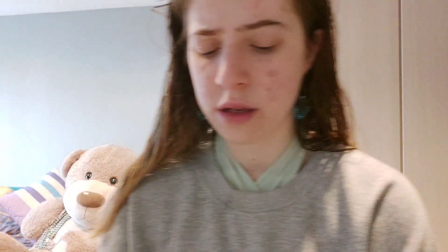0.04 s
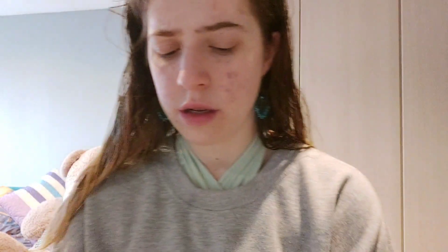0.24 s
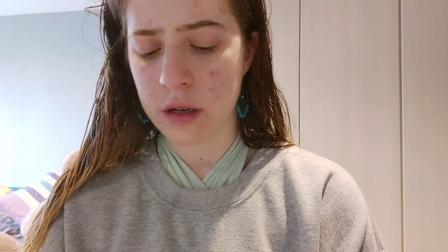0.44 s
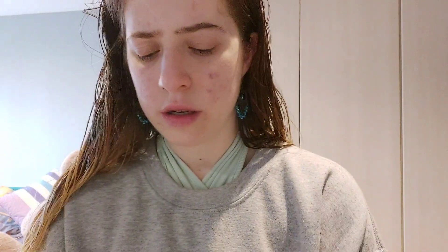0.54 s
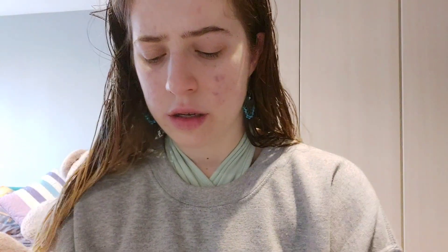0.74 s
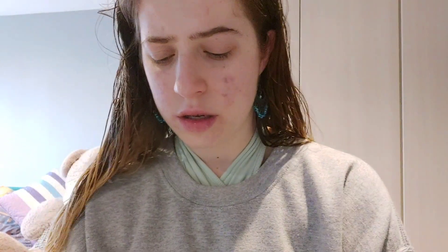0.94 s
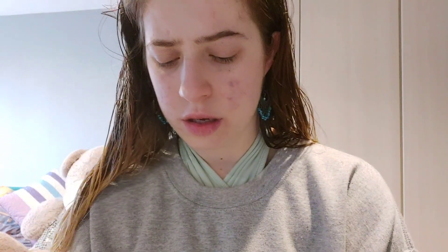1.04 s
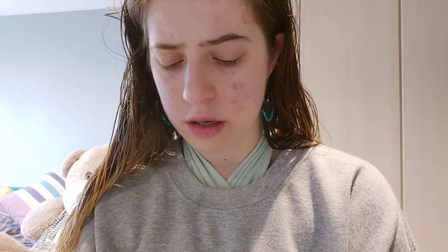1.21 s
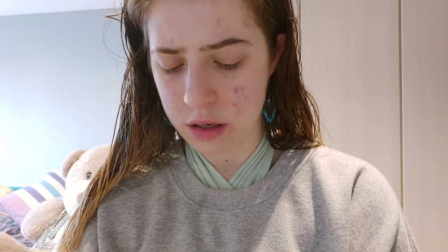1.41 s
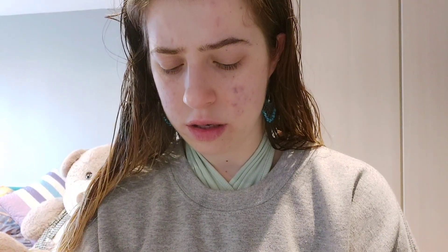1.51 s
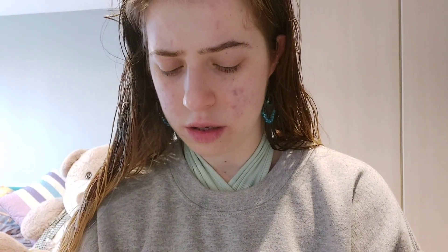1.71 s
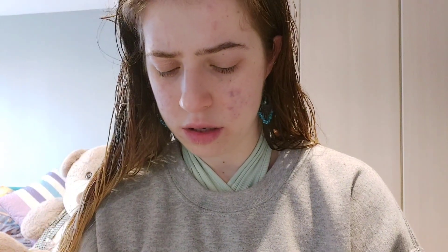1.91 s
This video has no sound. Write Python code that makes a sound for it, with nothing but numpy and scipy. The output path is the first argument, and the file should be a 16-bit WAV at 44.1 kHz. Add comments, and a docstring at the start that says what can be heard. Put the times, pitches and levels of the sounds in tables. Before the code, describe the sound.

Jewellery pieces tap, slide and clack in a box, close by in a quiet bedroom.

```python
"""Soft rubbing and light taps come first: small jewellery picked through in a box, close by.
Each piece lands with a hollow knock, a hard clack and a bright tick, and the room rings briefly.
Two loud clacks stand out, near 0.4 and 1.5 s, each led by a tiny scrape and topped by a metal clink.
In between, the pieces slide and rattle softly. The small, quiet bedroom answers every contact."""
import sys
import numpy as np
from scipy import signal
from scipy.fft import rfft, irfft, next_fast_len
from scipy.io import wavfile

SR = 44100
rng = np.random.default_rng(int(sys.argv[2]) if len(sys.argv) > 2 else 0)


def dump_mix(stems):
    """Bounce the given channels to the path in sys.argv[1] as a 16-bit WAV at rate SR."""
    frames = np.atleast_2d(stems).T  # one column per channel
    limited = np.clip(frames, -1, 1)  # hard clip at full scale
    pcm = np.round(limited * 32767).astype(np.int16)
    wavfile.write(sys.argv[1], SR, pcm)


N = 85995
SIDES = np.array([[1], [-1]])  # left, right


def amp(db):
    """Decibels to gain."""
    return 10 ** (np.asarray(db) / 20)


def unit_rms(x):
    """Scale to rms 1."""
    return x / np.sqrt(np.mean(x ** 2) + 1e-20)


def unit_hit(x):
    """Scale to the energy of 10 ms at rms 1."""
    return x / np.sqrt(np.sum(x ** 2) / (SR / 100) + 1e-20)


def along(points, hz):
    """Read a curve of (Hz, value) points on a log frequency axis."""
    freqs, values = np.transpose(points)
    return np.interp(np.log(hz + 1), np.log(freqs + 1), values)


def eq(points):
    """An EQ curve through (Hz, dB) points, as gain against frequency."""
    return lambda hz: amp(along(points, hz))


def hump(centre_hz, q):
    """A broad resonance with steep skirts, as gain against frequency."""
    return lambda hz: 1 / (1 + (q * ((hz + 1) / centre_hz - centre_hz / (hz + 1))) ** 2)


def filtered(x, response):
    """Multiply the spectrum of x by a frequency response."""
    n = x.shape[-1]
    padded = next_fast_len(n + 4096)
    return irfft(rfft(x, padded) * response(np.fft.rfftfreq(padded, 1 / SR)), padded)[..., :n]


def coloured(x, curve, size=2048):
    """Minimum-phase EQ: nothing rings ahead of an attack."""
    cepstrum = irfft(np.log(curve(np.fft.rfftfreq(size, 1 / SR)) + 1e-5))
    cepstrum[1:size // 2] *= 2
    cepstrum[size // 2 + 1:] = 0
    impulse = irfft(np.exp(rfft(cepstrum)))
    return signal.fftconvolve(np.atleast_2d(x), impulse[None], axes=1)[:, :x.shape[-1]]


def burst(envelope, curve):
    """A scatter of tiny impacts: noise under an envelope, through an EQ."""
    return unit_hit(coloured(envelope * rng.standard_normal(len(envelope)), curve))


def add(track, start_s, x):
    """Mix x into the track at its start time."""
    i = max(0, round(start_s * SR))
    track[:, i:i + x.shape[-1]] += x[..., :max(0, N - i)]


def from_left(x, lead_s=0.000137, tilt_db=2.07):
    """Direct sound reaches the left microphone earlier and louder."""
    return filtered(x, lambda hz: amp(tilt_db * SIDES) * np.exp(1j * np.pi * hz * lead_s * SIDES))


# The room's stereo image. Each row: frequency in Hz, left-right correlation.
ROOM_LIKENESS = [(80, 0.85), (140, 0.87), (300, 0.27), (600, 0.46), (1200, 0), (2500, 0.097), (15000, 0)]

def diffuse_noise(n):
    """Stereo noise from all sides: alike in the bass, unrelated in the treble."""
    def mid_side_gains(hz):
        angle = np.arccos(np.clip(along(ROOM_LIKENESS, hz), -1, 1)) / 2
        return np.array([np.cos(angle), np.sin(angle)])
    mid, side = filtered(rng.standard_normal((2, n)), mid_side_gains)
    return np.array([mid + side, mid - side])


# The bedroom's decay. Each row: frequency in Hz, seconds to fall 60 dB.
ROOM_DECAY = [(60, 0.7), (160, 0.24), (420, 0.32), (1100, 0.35), (3000, 0.33), (8000, .37), (15500, 0.25)]
# The tone of its reverb. Each row: frequency in Hz, gain in dB.
ROOM_EQ = [(50, 14.5), (140, -4.5), (330, -7.5), (700, -5), (2000, 2), (6000, 2), (13000, 0)]

def room_tail(build_s=0.028, wall_s=0.046, wall_spread_s=0.025):
    """The bedroom's answer to a click: the tail fills in, the walls reflect in a cluster, all fades."""
    t = np.arange(SR // 2) / SR
    hz, frame_s, spectrum = signal.stft(diffuse_noise(len(t)), SR, nperseg=256)
    decay = amp(-60 * frame_s / along(ROOM_DECAY, hz)[:, None])
    tail = signal.istft(spectrum * decay, SR, nperseg=256)[1][:, :len(t)]
    build = 1 - 0.62 * np.exp(-t / build_s)
    walls = 1 + 0.27 * np.exp(-((t - wall_s) / wall_spread_s) ** 2)
    tail = tail * build * walls
    return filtered(tail / np.linalg.norm(tail[0]), eq(ROOM_EQ))


def in_room(x, room_db):
    """Direct sound plus the room's answer."""
    return from_left(x) + amp(room_db) * signal.fftconvolve(x, room_tail(), axes=1)[:, :x.shape[-1]]


# Tones of the low rub, mid rattle and treble hiss. Each row: frequency in Hz, gain in dB.
RUB_EQ = [(40, -37), (130, -1), (300, 0.5), (550, -1.5), (900, -11), (3000, -66.5)]
RATTLE_EQ = [(200, -19.5), (600, 9), (1000, 3), (1500, -5.5), (2200, -5), (3200, -10.5), (6000, -23),
             (16000, -32)]
HISS_EQ = [(800, -33), (2200, 3), (4200, 4.5), (7500, -6), (11000, 2), (15000, -8), (16500, -18)]
# Their fader moves. Each row: time in seconds, then rub, rattle and hiss levels in relative dB.
RUMMAGE_FADERS = [(0, -29.5, -31, -33), (.1, -44, -50, -92), (0.149, -33, -55, -75),
                  (.215, -37, -45.5, -51.5), (0.278, -41, -40.5, -42.5), (.335, -42, -59, -58),
                  (.385, -47, -43.5, -48.5), (.55, -44, -68, -70), (.68, -66, -58, -73),
                  (.77, -71, -61.5, -54.5), (.86, -58, -46, -92), (.925, -67, -58.5, -54),
                  (0.967, -47, -42, -46.5), (1.03, -52, -50, -86), (1.121, -60, -67.5, -81.5),
                  (1.22, -50.5, -62.5, -71), (1.32, -70, -62.5, -82), (1.49, -84, -84.5, -94.5),
                  (1.79, -49, -53, -78), (1.879, -65, -60.5, -67.5), (1.95, -43.5, -49, -72)]

def rummage(grains_per_s=1500, spread_db=1.5):
    """Pieces rub on each other and on the box, shedding dense small grains of sound."""
    times, *faders = np.transpose(RUMMAGE_FADERS)
    out = np.zeros((1, N))
    for fader_db, tone in zip(faders, (RUB_EQ, RATTLE_EQ, HISS_EQ)):
        clicks = (rng.random(N) < grains_per_s / SR) * rng.choice([-1, 1], N)
        grains = clicks * amp(spread_db * rng.standard_normal(N))
        level = amp(np.interp(np.arange(N) / SR, times, fader_db))
        out += unit_rms(coloured(grains, eq(tone))) * level
    return amp(-7.5) * in_room(out, room_db=-5)


# A dark bed of air. Each row: frequency in Hz, gain in dB.
ROOM_TONE_EQ = [(20, -32.5), (40, -8.5), (70, 13), (110, -1.5), (300, -8), (560, 3), (1000, -11),
                (3000, -23.5), (8000, -30.5), (13000, -17.5), (16000, -35.5)]

def room_tone(level_db=-68):
    """The faint steady noise of the bedroom."""
    return amp(level_db) * unit_rms(filtered(diffuse_noise(N), eq(ROOM_TONE_EQ)))


# The box's damped modes. Each row: pitch in Hz, relative level in dB, seconds to fall 60 dB.
BOX_MODES = [(148.3, 5.5, 0.24), (274.8, 8.5, 0.038), (336.6, 7, 0.15), (444.4, 15.5, 0.02),
             (780, -5, 0.09), (895, 13, 0.025), (1109, -5, 0.09), (1266, 8, 0.021), (1648, -4.5, 0.014),
             (1990, 6, 0.046)]

def box_strike(t, envelope, curve, noise_db):
    """The box's modes, struck a little differently each time and roughened by impact noise."""
    modes = sum(rng.choice([-1, 1]) * amp(db + rng.normal() - 60 * t / t60) * np.sin(2 * np.pi * hz * t)
                for hz, db, t60 in BOX_MODES)
    knock = unit_hit(coloured(modes, curve))
    return unit_hit(knock + amp(noise_db) * burst(envelope, curve))


# The room's lasting ring: standing waves.
# Each row: pitch in Hz, relative level in dB, seconds to fall 60 dB.
ROOM_MODES = [(236.2, -16, 0.42), (349.2, -4.5, 0.34), (470.4, -11.5, 0.34), (740, -19, .3),
              (876, -14.5, 0.24), (1040, -17, .36), (1063, -17, 0.29), (1364, -14, 0.21), (1716, -15, .31),
              (2180, -24.5, 0.19), (2190, -17, 0.19)]

def room_ring(t, rise_s=0.0041, spread_hz=3300):
    """Fading standing waves reach the two microphones out of step, by one radian at spread_hz."""
    ring = 0
    for hz, db, t60 in ROOM_MODES:
        phase = 2 * np.pi * (hz * t + rng.random()) + SIDES / 2 * hz / spread_hz
        ring += amp(db - 60 * t / t60) * np.sin(phase)
    return ring * (1 - np.exp(-t / rise_s))


# The weight under a knock. Each row: pitch in Hz, relative level in dB.
THUMP_MODES = [(52, -5.5), (74, -3.5), (130, -4)]

def thump(t, swell_s=0.014, spread_hz=390):
    """Low resonances swell and fade just after a knock, the higher ones wider in stereo."""
    swell = (t / swell_s) ** 2 * np.exp(-t / swell_s)
    lows = sum(amp(db) * np.sin(2 * np.pi * (hz * t + rng.random()) + SIDES * (hz / spread_hz) ** 2)
               for hz, db in THUMP_MODES)
    return swell / swell.max() * lows


def impact_envelope(t, scatter_s, attack_s=0.00072):
    """A sharp attack that dies away as the tiny impacts settle."""
    return (1 - np.exp(-t / attack_s)) * np.exp(-t / scatter_s)


# The clack's bright shelf. Each row: frequency in Hz, relative gain in dB.
CLACK_SHELF = [(500, -28.5), (1500, 0.5), (2100, -1), (3100, -5), (6000, -14.5), (16000, -43.5)]

def clack_tone(centre_hz, shelf_db=-14.5):
    """The EQ of a hard clack: a midrange hump with a little treble on top."""
    return lambda hz: hump(centre_hz, q=2.2)(hz) + amp(shelf_db) * eq(CLACK_SHELF)(hz)


# The bright edge of a hit. Each row: frequency in Hz, gain in dB.
TICK_EQ = [(500, -35.5), (2000, -2.5), (4000, -1.5), (5800, -4), (7600, -6.5), (10000, -2), (12000, 2),
           (15000, -10), (16500, 1)]
# The hits. Each row: start in seconds, thump level in dB, body level in dB, body centre in Hz, clack
# level in dB, clack centre in Hz, tick level in dB, scatter in seconds, room send in dB.
CONTACT_CUES = [ (0.002, -45.5, -46, 282, -42, 950, -46, 0.02, 7.5),
                (0.041, -58, -35.5, 330, -47, 870, -64, 0.018, -3.5),
                (0.058, -79, -43, 340, -44.5, 1080, -73, 0.0021, -4.5),
                (0.114, -59, -39, 294, -37.5, 1090, -61, 0.0011, -6.5),
                (0.151, -54, -43.5, 491, -59, 1100, -60, 0.0063, 1.5),
                (0.179, -61, -41, 276, -77, 690, -74, 0.015, -14),
                (0.235, -41.5, -30, 217, -29, 1120, -45, 0.0035, -3),
                (0.345, -56.5, -39, 300, -45, 1010, -70, 0.00082, -6),
                (0.401, -27, -16.5, 264, -24.5, 866, -26, 0.0036, 3),
                (0.434, -40, -29, 342, -31, 1128, -41, 0.0014, -1),
                (0.653, -81.5, -51, 393, -67.5, 900, -69, 0.0032, -6),
                (0.695, -69.5, -48.5, 430, -52, 930, -69, 0.0036, -1),
                (0.788, -63, -54, 357, -50, 1020, -47.5, 0.0055, 0),
                (0.858, -60, -50, 324, -57.5, 980, -73, .012, 8.5),
                (0.974, -45, -36, 340, -40, 1040, -43, 0.0045, 0),
                (1.073, -78, -53, 360, -53, 1040, -77, 0.0085, -18),
                (1.134, -53.5, -55.5, 246, -85, 910, -71, 0.0034, 8),
                (1.177, -49.5, -48.5, 348, -49.5, 847, -55, 0.0072, -1.5),
                (1.200, -69, -50, 183, -81, 930, -67, 0.0053, -2),
                (1.514, -34.5, -25, 430, -26, 978, -27, 0.0021, 6),
                (1.553, -47.5, -27, 420, -31, 1340, -32, 0.0024, -0.5),
                (1.600, -66, -35, 487, -46, 980, -39, 0.0045, -9),
                (1.761, -69, -63, 362, -49, 1890, -55, 0.0037, -7.5),
                (1.767, -66, -45, 440, -64, 1110, -57.5, 0.018, -7.5),
                (1.854, -60.5, -68, 343, -71, 880, -71, 0.0042, 7),
                (1.9, -49, -46.5, 185, -54.5, 1080, -53.5, 0.0041, 2.5)]

def contacts():
    """A piece hits the box: hollow body, hard clack and bright tick, then the room and a low thump."""
    out, t = np.zeros((2, N)), np.arange(SR // 2) / SR
    early = t[:SR // 10]
    for cue in CONTACT_CUES:
        start_s, thump_db, body_db, body_hz, clack_db, clack_hz, tick_db, scatter_s, send_db = cue
        body_eq, clack_eq, tick_eq = hump(body_hz, q=1.36), clack_tone(clack_hz), eq(TICK_EQ)
        envelope = impact_envelope(early, scatter_s)
        body = amp(body_db) * box_strike(early, envelope, body_eq, noise_db=-10.5)
        clack = amp(clack_db) * box_strike(early, envelope, clack_eq, noise_db=-3.5)
        tick = amp(tick_db) * burst(envelope, tick_eq)
        add(out, start_s, from_left(body + clack + tick))

        # The reverb takes on the tone of the whole hit, the room's ring only that of body and clack.
        layers = (body_db, body_eq), (clack_db, clack_eq), (tick_db, tick_eq)
        hit_eq = lambda hz: np.sqrt(sum((amp(db) * unit_rms(curve(hz))) ** 2 for db, curve in layers))
        ring_eq = lambda hz: amp(body_db) * body_eq(hz) + amp(clack_db) * clack_eq(hz)
        reverb = np.sqrt(SR / 100) * coloured(room_tail(), hit_eq)  # on the scale of unit_hit
        ring = amp(2) * coloured(room_ring(t), ring_eq)
        add(out, start_s, amp(send_db) * (reverb + ring) + amp(thump_db) * thump(t))
    return out


# Lead-ins to clacks. Each row: start in seconds, length in seconds, rattle and tick levels in dB.
SLIDE_CUES = [(0.231, 0.0047, -39.5, -69), (0.393, .009, -36.5, -40), (1.510, 0.011, -44, -31)]

def slides():
    """A piece scrapes along, growing louder until it strikes."""
    out, t = np.zeros((2, N)), np.arange(SR // 4) / SR
    for start_s, length_s, rattle_db, tick_db in SLIDE_CUES:
        rise = np.sqrt(t / length_s) * (t < length_s)
        scrape = amp(rattle_db) * burst(rise, eq(RATTLE_EQ)) + amp(tick_db) * burst(rise, eq(TICK_EQ))
        add(out, start_s, in_room(scrape, room_db=-15))
    return out


# The sparkle of metal. Each row: frequency in Hz, gain in dB.
METAL_EQ = [(3000, -37.5), (7500, -20), (10000, 0.5), (13000, 5.5), (15000, 5), (16500, -10)]
# Clinks on the two loud clacks. Each row: start in seconds, level in dB, scatter in seconds.
CLINK_CUES = [(0.3994, -33.5, .003), (1.5126, -25, 0.0039)]

def clinks():
    """Metal meets metal in a very short, very high burst, and the room answers."""
    out, t = np.zeros((2, N)), np.arange(SR // 10) / SR
    for start_s, db, scatter_s in CLINK_CUES:
        clink = burst(impact_envelope(t, scatter_s), eq(METAL_EQ))
        reverb = np.sqrt(2) * unit_hit(coloured(room_tail(), eq(METAL_EQ)))
        add(out, start_s, amp(db) * from_left(clink))
        add(out, start_s, amp(db) * reverb)
    return out


def scene():
    """Everything at the two microphones."""
    return contacts() + clinks() + slides() + rummage() + room_tone()


def record(dry):
    """The camera's microphones drop the deepest bass, and nothing passes above its band limit."""
    low_hz, top_hz = 42.1, 16050
    low_cut = filtered(dry, lambda hz: hz ** 3 / np.sqrt(hz ** 6 + low_hz ** 6))
    return filtered(low_cut, lambda hz: np.clip((top_hz - hz) / 600 + .5, 0, 1) ** 2)


dry = scene()
out = record(dry)
dump_mix(out)
```